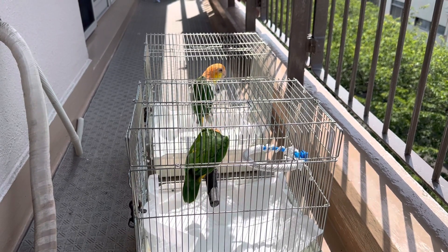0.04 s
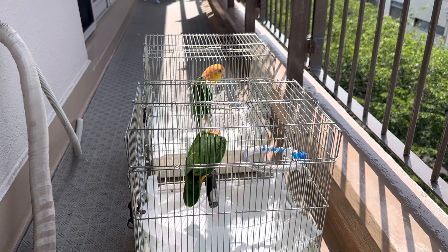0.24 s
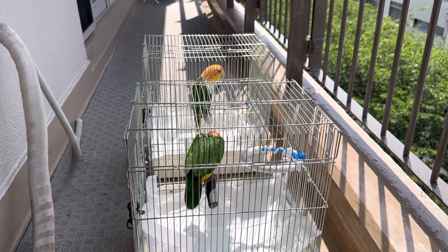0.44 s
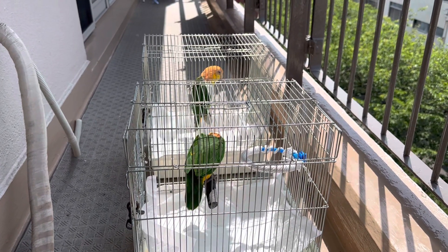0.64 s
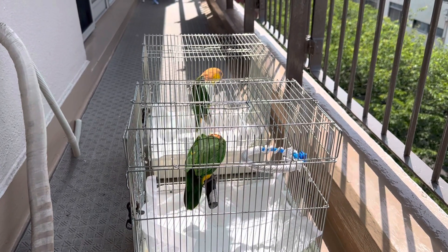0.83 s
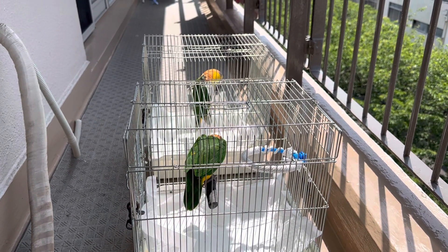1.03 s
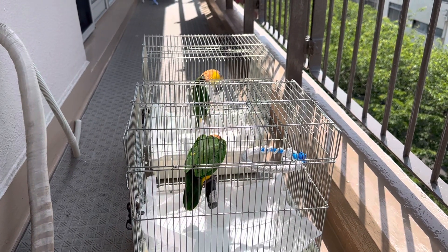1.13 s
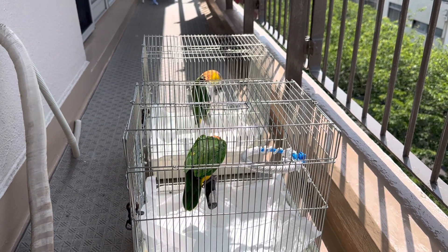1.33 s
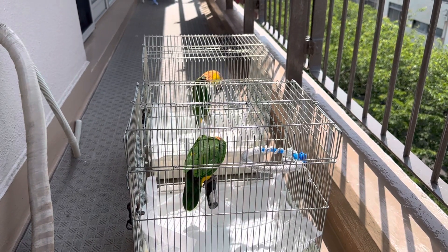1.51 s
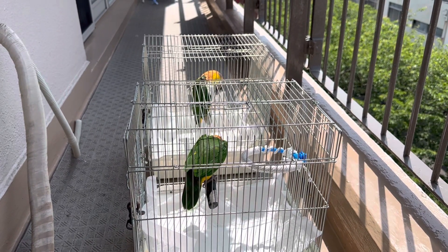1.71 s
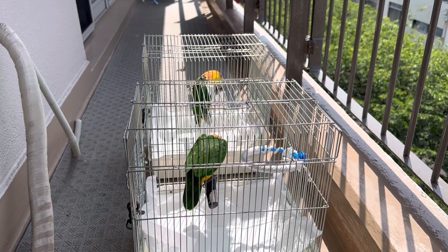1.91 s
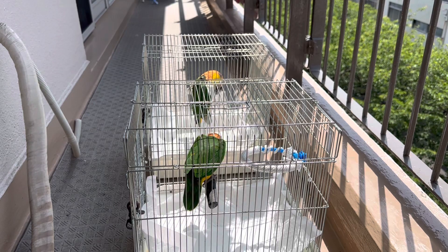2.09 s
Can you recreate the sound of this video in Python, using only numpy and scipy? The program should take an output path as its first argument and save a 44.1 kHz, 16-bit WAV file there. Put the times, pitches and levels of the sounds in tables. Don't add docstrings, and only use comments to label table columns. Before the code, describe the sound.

Two piercing parrot calls, a rattling screech then a rasp clearing to a whistle, ring off balcony walls

```python
import sys
import numpy as np
from scipy import signal
from scipy.fft import rfft, irfft, next_fast_len
from scipy.io import wavfile
from scipy.ndimage import uniform_filter1d

SR = 44100
rng = np.random.default_rng(int(sys.argv[2]) if len(sys.argv) > 2 else 0)


def waveform_to_disk(signal):
    frames = np.transpose(np.atleast_2d(signal))
    scaled = np.clip(frames, -1, 1) * 32767
    samples = np.round(scaled).astype(np.int16)
    wavfile.write(sys.argv[1], SR, samples)


def volts_from_db(level):
    exponent = np.asarray(level, float) / 20
    return 10 ** exponent


N = 94815


def evened(x):
    return x / np.sqrt(np.mean(x ** 2) + 1e-20)


def read(points, hz):
    f, value = np.transpose(points)
    return np.interp(np.log(hz + 1), np.log(f + 1), value)


def add(mix, s, sound):
    part = mix[round(s * SR):][:len(sound)]
    part += sound[:len(part)]


def resonate(x, hz, width):
    turn = np.exp(2j * np.pi * np.cumsum(hz * np.ones(len(x))) / SR)
    r = np.exp(-np.pi * abs(width) / SR)
    return 2 * (turn * signal.lfilter([1 - r], [1, -r], x / turn)).real


def narrow_noise(x, hz, width, second_width):
    return evened(resonate(resonate(x, hz, width), hz, second_width))


def wobble(size, span_s):
    k = max(int(span_s * SR), 2)
    smooth = uniform_filter1d(uniform_filter1d(rng.standard_normal(N), k), k)
    return evened(smooth)[:size]


# (f/Hz, left-right likeness 0-1)
LIKENESS = [(60, 1), (240, 0.9), (950, 0.37), (3770, 0.02), (15000, 0.19)]


def noise(spectrum, patchy_db):
    frames, hz = N // 256 + 5, np.fft.rfftfreq(1024, 1 / SR)
    a, b, c, d, patches = rng.standard_normal((frames, 513, 5)).T
    for axis in (1, 0):
        patches = uniform_filter1d(patches, size=10, axis=axis)
    same = np.clip(read(LIKENESS, hz), -1, 1)[:, None]
    left = a + 1j * b
    right = same * left + np.sqrt(1 - same ** 2) * (c + 1j * d)
    level_db = read(spectrum, hz)[:, None] + patchy_db * evened(patches)
    z = np.array([left, right]) * volts_from_db(level_db) * (hz > 20)[:, None]
    return evened(signal.istft(z, nperseg=1024, noverlap=768)[1][:, :N])


# (f/Hz, level/dB per Hz)
TRAFFIC = [(15, -45), (25, -15), (43, -8), (138, -6), (174, -11), (737, -20.5), (2680, -38), (3050, -42.5),
           (12000, -72), (15600, -115), (22000, -120)]


def traffic():
    return volts_from_db(-48) * noise(TRAFFIC, patchy_db=.8)


# (f/Hz, width/Hz, level/dB)
HUMS = [
    (56, 24, -58),
    (144.85, 6.7, -57.5),
]


def machine_hums():
    return sum(volts_from_db(db) * narrow_noise(rng.standard_normal(N), hz, w, w) for hz, w, db in HUMS)


# (f/Hz, level/dB per Hz)
HISS = [(1180, -34), (2000, -8.5), (3430, -2), (3730, 1.5), (5630, -11.5), (7540, -16), (12000, -51),
        (15600, -85), (22000, -120)]
# (t/s, level/dB)
RUSTLE_COURSE = [
    (0, -65.5),
    (.05, -68),
    (.09, -93.5),
    (1.72, -94),
    (1.82, -73),
    (1.9, -68.5),
    (2.06, -56),
    (2.15, -60),
]


def hiss():
    level_db = np.interp(np.arange(N) / SR, *np.transpose(RUSTLE_COURSE))
    return volts_from_db(level_db) * noise([(900, -32.0)] + HISS, patchy_db=-6.0)


# (t/s, level/dB, f/Hz)
TICKS = [
    (.038, -59.5, 3440),
    (1.479, -73, 3000),
    (1.763, -67, 4600),
    (1.787, -64.5, 4650),
    (1.911, -76, 8250),
]


def claw_ticks():
    out, t = np.zeros(N), np.arange(300) / SR
    for s, db, hz in TICKS:
        strike = np.cos(2 * np.pi * hz * t) + 0.6 * rng.standard_normal(300)
        add(out, s, volts_from_db(db - 60 * t / 0.011) * strike)
    return out


# (flips a second f/Hz, a moment at the upper pitch t/s)
FLIPS = [
    (94, .466),
    (125, 0.85),
]
OVERTONES_DB = (-5.5, -6, -9.5, -16, -7, -20, -12.5, -13, -30, -31)
# (multiple of the pitch, level/dB)
HALF_TONES = [(1.5, -54), (3.5, -38), (4.5, -48)]


def syrinx(rows, which):
    flip_hz, crest_s = FLIPS[which]
    s, *columns = np.transpose(rows)
    t = np.arange(s[0], s[-1], 1 / SR)
    size = len(t)
    upper, lower, effort_db, rough = (np.interp(t, s, c) for c in columns)
    rough = np.clip(rough, 0, 1)

    beat = np.cos(2 * np.pi * flip_hz * (t - crest_s) + .55 * wobble(size, 0.0055))
    up = (1 + np.tanh(5 * (beat + .1))) / 2
    gap = 1 - lower / upper
    loose = rough * (1 - .88 * up * np.clip(gap / .2, 0, 1))
    hz = lower + (upper - lower) * up
    jitter = .13 * loose * wobble(size, .0009)
    tremor = 0.0064 * wobble(size, .002)
    turns = np.cumsum(hz * (1 + jitter + tremor)) / SR

    thin_db = -19 * np.exp(-rough / 0.031) - 8 * up * np.clip(gap / .1, 0, 1)
    tones = np.zeros(size)
    for k, db in enumerate(OVERTONES_DB):
        audible = (k + 1) * hz < 17000
        tones += volts_from_db(db + thin_db * (k > 0)) * np.cos(2 * np.pi * (k + 1) * turns + k ** 2) * audible
    for k, db in HALF_TONES:
        tones += volts_from_db(db + 4 * wobble(size, .006)) * np.cos(np.pi * round(2 * k) * turns)

    breath = resonate(rng.standard_normal(N)[:size], 2 * hz, 8300)
    breath = volts_from_db(-11) * loose * (breath - uniform_filter1d(breath, size=17))
    throb = volts_from_db(2.5 * np.minimum(rough * 2, 1) * beat + 6.5 * rough * wobble(size, 0.0017))
    release = np.minimum((s[-1] - t) / 0.0035, 1)
    out = np.zeros(N)
    add(out, s[0], volts_from_db(effort_db) * throb * (tones + breath) * release)
    return out


# (f/Hz, level/dB)
BEAK = [(900, -18.5), (1700, -16), (2600, 0.5)]
# (f/Hz, level/dB)
PLAIN = [(900, 15.5), (3000, -7), (8000, -5.5), (9500, -38.5), (11000, -37.5), (15000, -33.5)]
# (f/Hz, width/Hz, left level/dB, right level/dB)
RINGS = [(2016, 230, 7.5, 8.5), (2450, 57, -13, -3), (2740, 45, 3, -4.5), (3150, 250, 0.5, 5.5),
         (3540, 85, 7.5, 4), (4320, 210, 1.5, -13.5), (4790, 390, -1, -2), (5363, 240, -6.5, -21),
         (5815, 70, 1.5, 2.5), (6630, 89, -24.5, -26.5), (8170, 197, 2, -0.5)]


def throat(x):
    hz = np.fft.rfftfreq(N, 1 / SR)
    radiated = irfft(rfft(x) * volts_from_db(read(BEAK, hz)), N)
    out = irfft(rfft(radiated) * volts_from_db(read(PLAIN, hz)), N)
    for f, width, left_db, right_db in RINGS:
        out = out + volts_from_db(np.array([[left_db], [right_db]])) * resonate(radiated, f, width)
    return out


TURN_DB = (3, 1)
LEAD_US = (41.2, 32.5)


def ports(x, which):
    side = np.array([[.5], [-.5]])
    shift = np.exp(2j * np.pi * np.fft.rfftfreq(N, 1 / SR) * side * LEAD_US[which] / 10 ** 6)
    return irfft(rfft(x) * shift * volts_from_db(side * TURN_DB[which]), N)


# (t/s, upper f/Hz, lower f/Hz, effort level/dB, roughness 0-1)
CLIMB = [(.18, 1020, 990, -59, 0), (.192, 1313, 1240, -29.5, 0.65), (.199, 1470, 1510, -25, 0.28),
         (.201, 3224, 1548, -24, 0.77), (.212, 3165, 1639, -21.5, 0), (.214, 3613, 1646, -18.5, 0.35),
         (.221, 3592, 1659, -14.5, 0.42), (.232, 3540, 1730, -22, 0.04), (.236, 3540, 1818, -24, 1),
         (.25, 3510, 1860, -27, 1.1), (.253, 3226, 1995, -26.5, 1), (.272, 3115, 2450, -27, 0.42),
         (.302, 3184, 2690, -23, 0.1), (.314, 3150, 2907, -26.5, 0.3), (.317, 3493, 2873, -20.5, 0.1),
         (.331, 3600, 3150, -11.5, 0.3), (.34, 3528, 3210, -24.5, 0.1), (.36, 3563, 3150, -17, .2),
         (.364, 3484, 3150, -32, .2)]
# (t/s, upper f/Hz, lower f/Hz, effort level/dB, roughness 0-1)
RATTLE = [(.385, 3572, 3224, -25, .3), (.404, 3594, 3242, -26.5, 0.25), (.412, 3528, 2531, -25, 0.87),
          (.43, 3525, 2517, -26.5, 0.87), (.434, 3530, 2436, -12.5, 0.31), (.443, 3585, 2302, -33.5, 1),
          (.451, 3477, 2103, -22, 0.75), (.455, 3526, 2102, -21.5, 0.62), (.47, 3540, 1965, -18.5, 0.81),
          (.51, 3530, 1832, -20, 0.68), (.525, 3540, 1678, -20.5, 0.33), (.529, 3162, 1657, -16.5, 0.73),
          (.555, 3142, 1497, -20, 0.43), (.56, 2540, 1271, -25.5, 0.72), (.58, 2450, 971, -43, 1)]


def rattling_screech():
    return ports(throat(syrinx(CLIMB + RATTLE, 0)), 0)


def tail(t60, start_s):
    t = np.arange(int(1.2 * SR)) / SR
    a, b = rng.standard_normal((2, len(t))) * volts_from_db(-60 * t / t60) * (t > start_s)
    share = 0.24
    return np.array([a, share * a + np.sqrt(1 - share ** 2) * b]) / np.linalg.norm(a)


# (left t/ms, right t/ms, left level/dB, right level/dB)
WALLS = [(1.3, 1.143, -12, -13.5), (2.6, 2.7, -8, -3.5), (4.7, 4.2, -11.5, -7), (8.1, 10, -10.5, -12),
         (12.4, 14, -16.5, -14.5), (19, 20.3, -19.5, -13)]
# (delay t/s, level/dB)
ECHOES = [
    (.212, -37),
    (.41, -48),
    (.56, -47),
]


def balcony(x):
    near = volts_from_db(-4.5) * tail(0.16, 0.0051)
    near[:, 0] += 1
    for left_ms, right_ms, left_db, right_db in WALLS:
        delays = [int(left_ms * SR / 1000), int(right_ms * SR / 1000)]
        near[[0, 1], delays] += volts_from_db(np.array([left_db, right_db]))
    far = volts_from_db(-29.5) * tail(1, 0.043)
    for s, db in ECHOES:
        far += volts_from_db(db) * np.roll(tail(.012, 0), int(s * SR), axis=1)
    far = signal.lfilter(*signal.butter(2, 4500, fs=SR), far)
    return signal.fftconvolve(x, near + far, axes=1)[:, :N]


# (t/s, spread t/s, f/Hz, level/dB)
GUSTS = [
    (0.649, 0.042, 60.6, -45.5),
    (.81, 0.023, 83.7, -51.5),
]


def gusts():
    t, out = np.arange(N) / SR, np.zeros(N)
    for s, spread, hz, db in GUSTS:
        turns = np.cumsum(hz * (1 + 0.079 * wobble(N, 0.0082))) / SR
        out += volts_from_db(db) * np.exp(-((t - s) / spread) ** 2 / 2) * np.sin(2 * np.pi * turns)
    return out


# (peak t/s, spread t/s, f/Hz, width/Hz, level/dB)
MOTOR = (1.04, .12, 1290, 200, -56)


def passing_motor():
    peak, spread, hz, w, db = MOTOR
    drone = np.array([narrow_noise(v, hz, w, w) for v in rng.standard_normal((2, N))])
    return volts_from_db(db) * drone * np.exp(-((np.arange(N) / SR - peak) / spread) ** 2 / 2)


# (t/s, upper f/Hz, lower f/Hz, effort level/dB, roughness 0-1)
RASP = [(.729, 1012, 998, -40.5, 0.22), (.734, 997, 1010, -27, 0.2), (.74, 1379, 1315, -27, 0.41),
        (.746, 1511, 1549, -18, 0.31), (.751, 1674, 1574, -22.5, 0.63), (.754, 2368, 2375, -24, 0.84),
        (.76, 2330, 2268, -21, 0.094), (.771, 2486, 2450, -17, .1), (.773, 3300, 2450, -25, 0.55),
        (.777, 3178, 2450, -13.5, 0.7), (.786, 3128, 2490, -21, 0.58), (.8, 3150, 2396, -25, 0.35),
        (.809, 3150, 2520, -30.5, 0.49), (.812, 3150, 2774, -34, 0.27), (.817, 3160, 2957, -24.5, 0.24)]
# (t/s, f/Hz, effort level/dB)
WHISTLE = [
    [(.821, 3065, -26), (.825, 3060, -28), (.832, 3081, -19.5), (.868, 3055, -20), (.876, 3174, -38),
     (.884, 3034, -17.5), (.902, 3080, -14.5)],
    [(.915, 3063, -15), (.944, 3007, -15.5), (.957, 2928, -21.5), (.968, 2982, -27.5), (.984, 2966, -21.5),
     (1.012, 2948, -39.5)],
]


def rasp_to_whistle():
    clear = [(s, hz, hz, db, 0.0033) for s, hz, db in sum(WHISTLE, [])]
    return ports(throat(syrinx(RASP + clear, 1)), 1)


# (start t/s, length t/s, from f/Hz, to f/Hz, level/dB)
CHIRPS = [(1.82, .035, 4500, 3700, -63), (1.828, .03, 5200, 4300, -66), (1.845, .04, 3400, 3250, -65),
          (1.865, .03, 2900, 2400, -68), (1.92, .05, 6600, 6100, -68), (1.945, .04, 3250, 3000, -66),
          (1.955, .035, 4700, 4500, -66), (1.985, .045, 4100, 3950, -62), (2.01, .09, 3700, 3550, -61),
          (2.045, .025, 3200, 3100, -64), (2.04, .05, 4700, 4500, -66), (2.122, .028, 3250, 3150, -58)]


def far_chirps():
    out = np.zeros(N)
    for s, length, from_hz, to_hz, db in CHIRPS:
        u = np.linspace(0, 1, int(length * SR))
        hz = from_hz + (to_hz - from_hz) * u
        fuzz = narrow_noise(rng.standard_normal(4000)[:len(u)], hz, 260, 300)
        add(out, s, volts_from_db(db) * fuzz * np.sin(np.pi * u ** 0.5))
    return out


def scene():
    ambience = traffic() + machine_hums() + hiss()
    ringing = balcony(claw_ticks() + rattling_screech() + rasp_to_whistle() + far_chirps())
    return ambience + ringing + gusts() + passing_motor()


def roll_off(x):
    return signal.sosfilt(signal.butter(12, 16110, fs=SR, output="sos"), x)


# (f/Hz, level/dB)
MIC = [(20, -28), (42, 3.5), (9000, 3), (10300, -6.5), (10700, -39.5), (11600, -33), (12200, -24),
       (12900, -29), (13400, 3.5), (15700, -9.5), (16200, -50.5)]


def record(dry):
    limit = .75
    size = next_fast_len(N + 4096)
    long = np.pad(limit * np.tanh(dry / limit), ((0, 0), (0, size - N)), "reflect")
    colour = volts_from_db(read(MIC, np.fft.rfftfreq(size, 1 / SR)))
    heard = irfft(rfft(long) * colour, size)[:, :N]
    return roll_off(heard)


dry = scene()
out = record(dry)
waveform_to_disk(out)
```